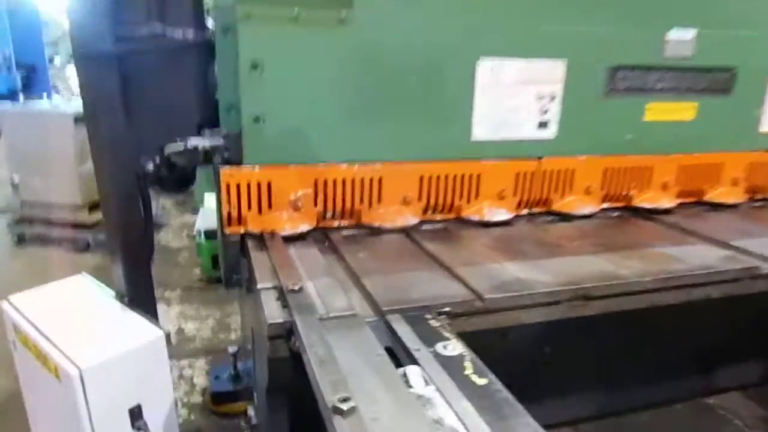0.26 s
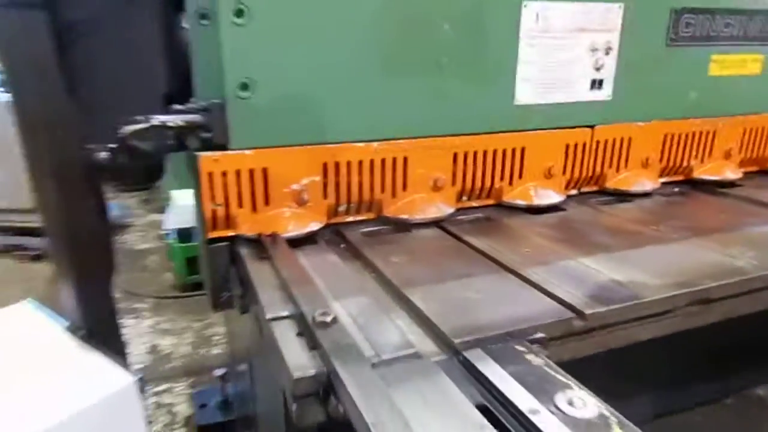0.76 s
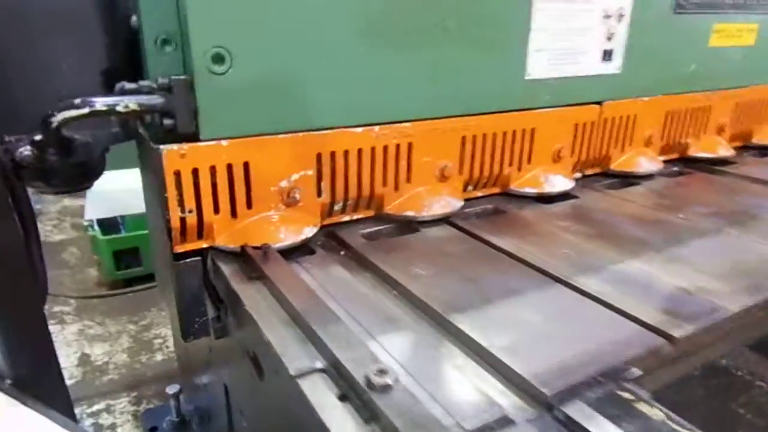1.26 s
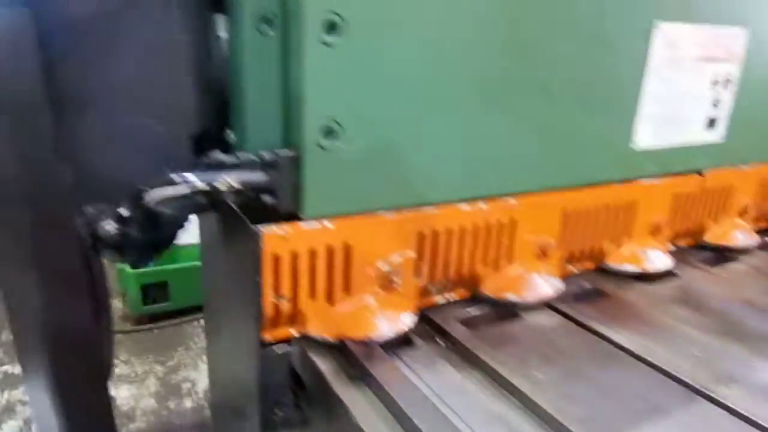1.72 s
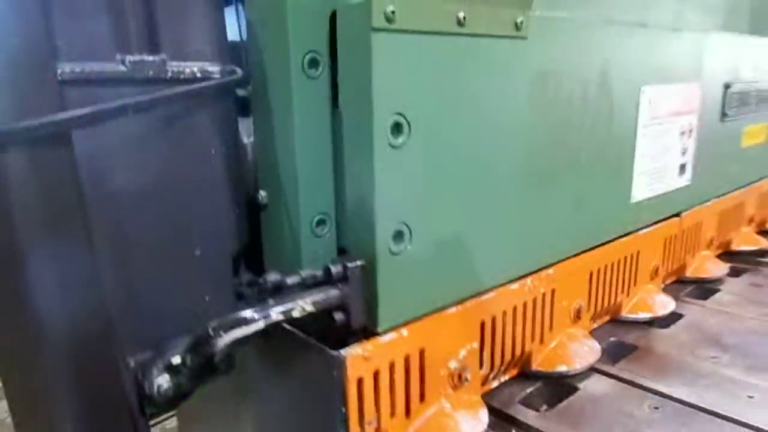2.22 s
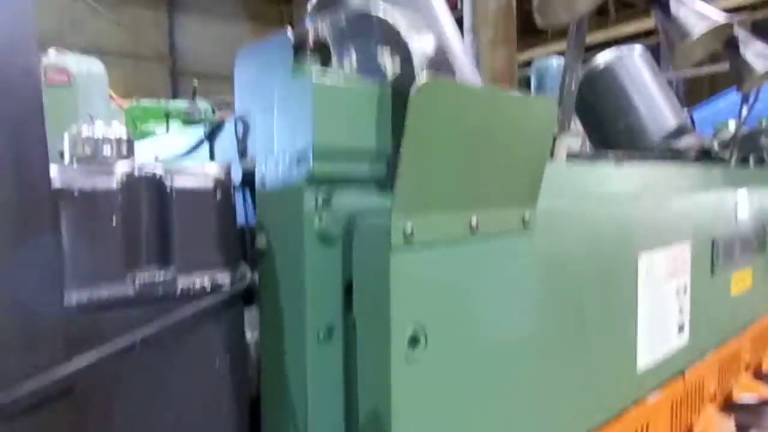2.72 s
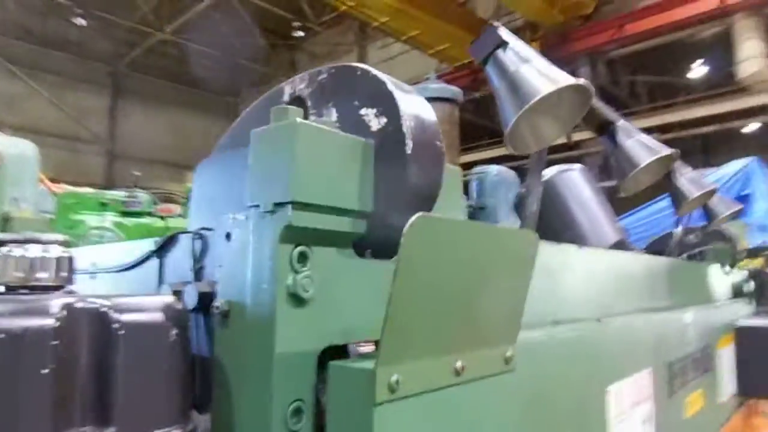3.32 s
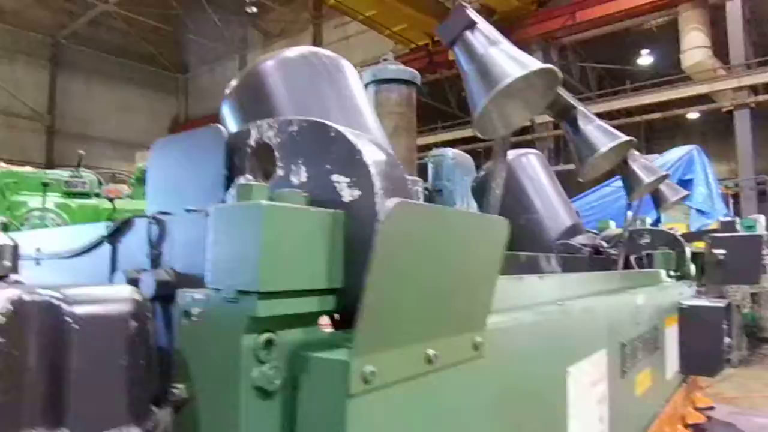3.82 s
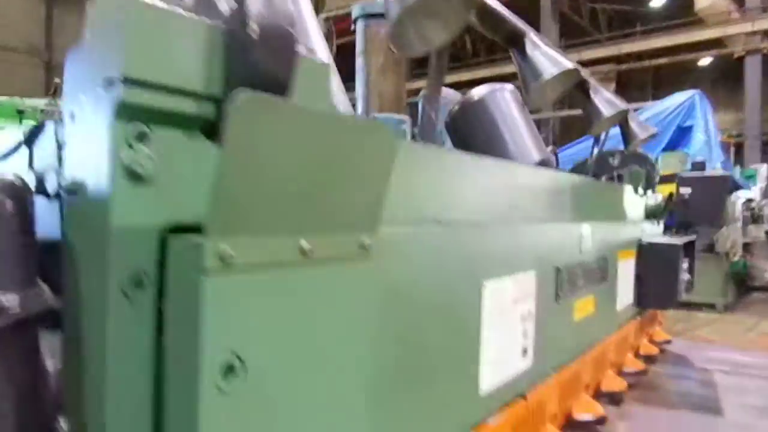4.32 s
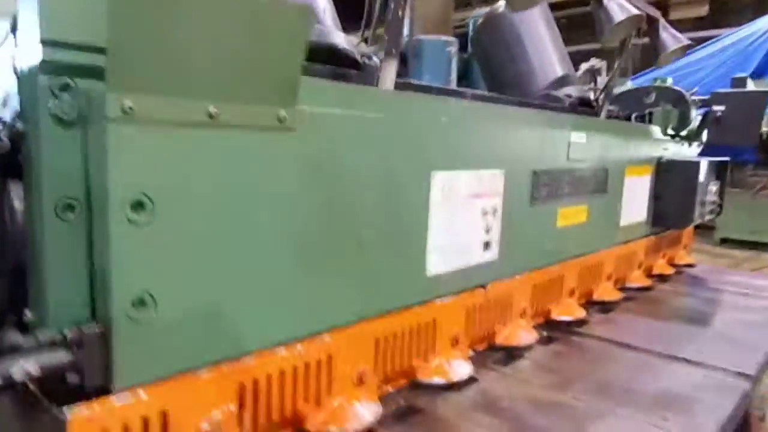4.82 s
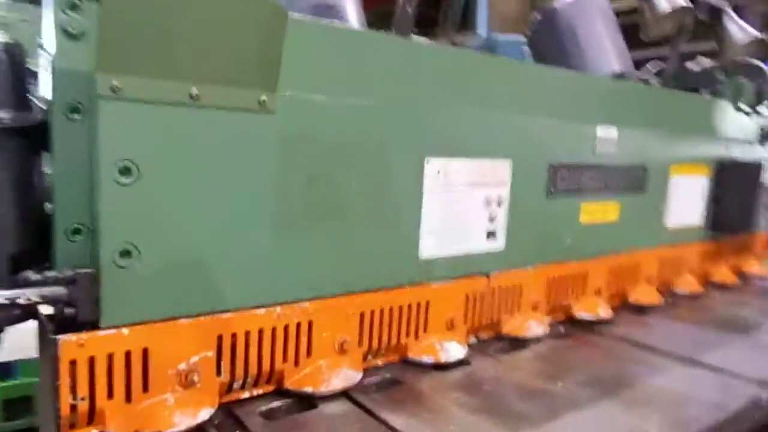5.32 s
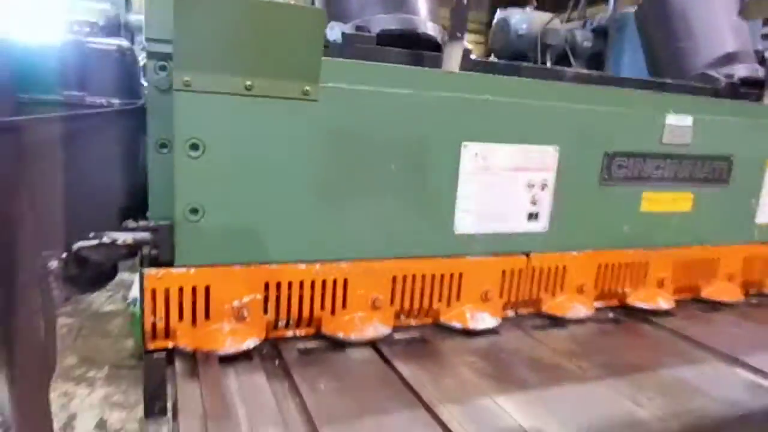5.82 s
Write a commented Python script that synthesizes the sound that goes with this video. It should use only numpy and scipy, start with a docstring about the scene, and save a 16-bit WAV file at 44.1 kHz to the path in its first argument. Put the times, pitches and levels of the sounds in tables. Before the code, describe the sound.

Steady, heavy machine rhythm at about one cycle per second. Dense, sharp steel rattling opens the sound, then a short rush like escaping air, more rattling and a weighty thump of the cast frame, a small gap, a knock from a linkage and the rattle again. Six strokes are heard, close and dry with a weak tail from a big industrial hall and very quiet low motor hum. Treble is crisp but capped.

```python
"""A mechanical plate shear idles in a large workshop, one stroke a second, heard close over a motor hum.
The take opens on the clatter of the clamp row: tiny collisions, steel contacts and ringing steel parts.
Then come a short hiss of fine grit, a tick, and a second clatter that swells into a heavy thud, jolts
ringing in the modes of the frame. A dull knock with a ringing link, made of decaying sines, leads into
the next turn. The hall rings on faintly as decaying noise; the microphone port notches the treble."""
import sys
import numpy as np
from scipy import signal
from scipy.fft import rfft, irfft
from scipy.io import wavfile
from scipy.ndimage import uniform_filter1d

SR = 44100
rng = np.random.default_rng(int(sys.argv[2]) if len(sys.argv) > 2 else 0)


def wav_record(signal):
    """Record a signal, one row per channel, as 16-bit PCM in the file named by sys.argv[1]."""
    frames = np.transpose(np.atleast_2d(signal))
    bounded = np.clip(frames, -1, 1)
    # unit amplitude maps onto the largest positive 16-bit level
    quanta = np.round(bounded * 32767).astype(np.int16)
    wavfile.write(sys.argv[1], SR, quanta)


N = 267246
T = np.arange(N) / SR   # s

# The motor hum. Each row: frequency in Hz, relative level in dB.
HUM_SPECTRUM = [(15, -41), (25, -2.5), (161, 0.5), (293, -0.5), (354, -8), (624, -3), (1040, -7),
                (1560, -11.5), (3250, -7.5), (7920, -18), (11000, -29), (14400, -30), (16000, -43)]
HUM_DB = -50

# The hall. Each row: frequency in Hz, time to fall 60 dB in s, relative starting level in dB.
HALL_DECAY = [(60, 3.2, 1.5), (300, 4.5, -2), (1510, 1.75, -1), (4930, 0.65, -2.5), (14000, 0.2, 4.5)]
HALL_DB = -29.5   # energy of the echo response against the direct sound

# Bands of the bright noise. Each row: centre in Hz, part it belongs to (0 middle, 1 low, 2 top).
# The lowest band belongs to no part and is left out.
NOISE_BANDS = [(900, None), (1900, 1), (2900, 1), (4200, 0), (5400, 0), (6700, 0), (8200, 0), (10000, 2),
               (13500, 2), (20000, 2)]
# Colour of the bright noise. Each row: frequency in Hz, relative level in dB.
BRIGHT_SPECTRUM = [(410, -30), (700, 17), (1380, -17.5), (1870, -6.5), (3280, -3.5), (3940, 0), (6230, 3),
                   (7890, -2.5), (10800, -7), (15000, -14.5), (16000, -51)]

# Hisses. Each row: start in s, hiss level in dB, shift of its top part in dB,
# level of the frame's shaking in dB, shift of its upper part in dB.
HISSES = [(0.247, -36.5, -1, -40, 1), (1.25, -36, 1, -39.5, 0.5), (2.256, -37.5, 0, -39.5, 0.5),
          (3.262, -35, -1, -41.5, 3.5), (4.266, -33.5, -0.5, -37, -1.5), (5.272, -33.5, 0.5, -37.5, -0.5)]
# Course of a hiss. Each row: time from its start in s, level in dB, low and top part against it in dB.
HISS_COURSE = [(0.0, -9, -10, -2), (0.012, 0, -2, -4), (0.084, -13.5, -3.5, -6.5), (0.093, -6, -5, 4)]
# The frame under a hiss. Each row: time from its start in s, level in dB, upper part against it in dB.
HISS_SHAKE = [(0.0, -16, -6), (0.016, -0.5, -1.5), (0.1, -8, 0)]

# Knocks on the link. Each row: start in s, level in dB, bright part of the crack in dB, crack length in s,
# ring of the low modes and of the high modes against the level in dB, relative level of the thump in dB.
KNOCKS = [(0.84, -29, -17, 0.019, -13, -28, -35), (0.865, -21.5, -3, 0.016, -17, -19, -35),
          (1.842, -29, -24, 0.0078, -20, -7.5, -27.5), (1.8696, -24, 1.5, 0.015, -18, -9.5, -27),
          (2.845, -25.5, -25, 0.0058, -9.5, -12.5, -28.5), (2.882, -20.5, -6.5, 0.017, -7, -15.5, -29),
          (3.8534, -20.5, -22, 0.014, -25.5, -2.5, -23), (3.879, -17.5, 0, 0.011, -9, -14, -25),
          (4.859, -22.5, -19, 0.0049, -23, -25, -20), (4.886, -45, 11, 0.012, -10, -14, -30),
          (4.901, -25.5, -12, 0.026, -28, -19, -29), (5.8641, -30, -32, 0.0077, -14, -17, -22.5),
          (5.882, -52, -10, 0.012, -13, -25, -39), (5.908, -24.5, -11, 0.048, -8, -20, -35)]
# Modes of the link. Each row: frequency in Hz, relative level in dB, time to fall 60 dB undamped in s.
LINK_MODES = [(1367, 0, .22), (1653, -10, .15), (2067, -6, .15), (2433, -6, .2), (2918, 0, .17),
              (4258, -7, .13)]
# The frame shaking under the knocks. Each row: time in s, level in dB, shift of the upper part in dB.
KNOCK_SHAKES = [(0.844, -28, 3.5), (1.86, -32, 1), (2.882, -31, -3), (3.861, -26.5, 2), (4.888, -32, 0),
                (5.892, -31.5, -3)]
# Its course. Each row: time from the knock in s, level in dB, upper part against it in dB.
KNOCK_SHAKE = [(-0.01, -18, -17), (0.0, 0, 0), (0.04, -2, -13.5), (0.1, -16.5, -6)]

# Single steel contacts. Each row: start in s, level in dB, low part against it in dB,
# strongest pitch in Hz, length in s.
CONTACTS = [(0.0002, -10, -10, 5750, 0.016), (0.038, -21, -14, 4940, .012), (0.336, -32, -13, 3240, 0.0094),
            (0.3434, -30, -14, 7900, 0.0027), (0.378, -32, -11, 5250, .015), (0.398, -25, -17, 7260, .008),
            (0.405, -20, -11, 3280, .011), (0.413, -13, -20, 5270, 0.0087), (0.957, -35, -3, 5920, .008),
            (0.968, -27, -15, 3440, .007), (0.977, -14, -14, 7200, 0.0078), (1.001, -14, -12, 6200, .013),
            (1.014, -14.5, -16, 7500, 0.015), (1.032, -15.5, -20, 6070, 0.022),
            (1.341, -25, -3, 7250, 0.015), (1.364, -28.5, -13, 3650, .01), (1.378, -24, -3, 7350, .009),
            (1.39, -17, -16, 7270, .014), (1.415, -11.5, -4, 4130, .02), (1.9607, -33, -9, 4980, .01),
            (1.9825, -23.5, -8, 7640, 0.0061), (2.002, -31, -14, 3000, .006),
            (2.0107, -18, -16, 5800, .015), (2.029, -21, -12, 3200, .006), (2.041, -18, -3, 5700, 0.018),
            (2.347, -22.5, -6.5, 3330, 0.0049), (2.359, -35, -15, 3040, .009), (2.373, -26, 2, 3250, 0.018),
            (2.393, -16.5, -17, 3120, 0.023), (2.424, -13, -12, 6250, .008),
            (2.9652, -30, -22, 6850, 0.0054), (2.983, -29.5, -5, 3200, .005),
            (2.988, -12.5, -7, 6340, 0.0053), (3.0, -24, -17, 6150, .01), (3.0147, -11, -6, 6400, .017),
            (3.052, -18.5, -21, 4660, 0.013), (3.352, -25.5, 0.5, 3240, 0.0048),
            (3.36, -26.5, -15, 2900, .008), (3.3726, -28, 1, 6200, .012), (3.4003, -16.5, -2, 6900, .01),
            (3.4245, -15, 3.5, 3000, 0.019), (3.971, -32.5, -12, 3070, 0.012),
            (3.984, -27.5, 0, 2980, 0.01), (3.9938, -18.5, -6, 6290, 0.0095), (4.0166, -11, -5, 6400, .008),
            (4.0285, -14.5, -4, 6800, .008), (4.061, -22, -20, 4400, 0.0068),
            (4.358, -24.5, -7, 3000, 0.013), (4.392, -31, -13, 3370, .011), (4.4033, -19, -10, 3180, .015),
            (4.431, -15, 4, 5300, 0.01), (4.976, -31.5, -8, 5940, 0.014), (4.9977, -26, -12, 6500, 0.0085),
            (5.0174, -20, 1.5, 3170, 0.0066), (5.023, -10.5, -14, 6300, 0.0056),
            (5.035, -18, -16, 6640, 0.01), (5.056, -16.5, -4, 5030, .006), (5.066, -19.5, -6, 4970, 0.0072),
            (5.3643, -26.5, -3, 7020, .008), (5.3735, -27, -19, 8100, .008), (5.397, -23, -14, 6700, 0.012),
            (5.408, -14, 0, 7300, .012), (5.438, -10.5, -16, 7500, .01), (5.983, -33, -15, 5000, .011),
            (5.995, -25.5, -12, 6600, 0.012), (6.004, -14, -9.5, 7500, 0.0039),
            (6.019, -23, -8, 6500, .007), (6.027, -11, -9, 5900, .006), (6.038, -13, -14, 7000, 0.011)]
CONTACT_TOP_DB = -10   # top part against the contact's level
# Ringing steel parts. Each row: frequency in Hz, nominal width in Hz, relative level in dB.
STEEL_PARTS = [(2198, 38, 2), (2605, 12, -8.5), (3246, 85, 7.5), (3710, 38, -14), (4233, 17, -1),
               (4780, 17, 4.5), (5150, 110, 6.5), (5790, 17, -16), (6350, 25, -18), (6450, 82, -14),
               (6000, 40, -18), (7000, 84, 5), (7220, 85, -7), (7880, 190, 9.5), (8300, 78, -7.5),
               (9050, 38, -16)]

# Clatters of the clamp row. Each row: last peak in s, chatter level in dB, shift of its top part in dB,
# level of the frame's shaking in dB, shift of its upper part in dB.
CLAMPS = [(0.042, -19, 2, -34, -2), (1.047, -15.5, 2, -33, 2), (2.056, -18, 3, -32, -2.5),
          (3.057, -15.5, -2, -32, 0), (4.064, -15, -2.5, -32, 1), (5.066, -18.5, 1.5, -33, 1),
          (6.066, -20, 3, -32.5, 3)]
# Course of the chatter. Each row: time from the peak in s, level in dB, low and top part against it in dB.
CLAMP_CHATTER = [(-0.08, -22, 0, -9), (-0.048, -12.5, 0, -9), (-0.035, -4.5, -3, -10),
                 (0.0, -1.5, -10, -10), (0.028, -25.5, -2.5, -15), (0.065, -44, -13, -9)]
# The frame under it. Each row: time from the peak in s, level in dB, upper part against it in dB.
CLAMP_SHAKE = [(-0.085, -16, -3), (-0.03, -4, 5), (0.0, -0.5, 4.5), (0.05, -15.5, -6.5), (0.08, -19, -5)]

# Heavy strokes. Each row: chatter peak in s, its level in dB, shift of its top part in dB,
# thud in s, its level in dB, shift of its upper part in dB, relative level of its first thump in dB.
STROKES = [(0.427, -17, 0.5, 0.45, -16, -1, -17), (1.43, -15.5, 0.5, 1.452, -13.5, 0.5, -13.5),
           (2.431, -15, -1, 2.469, -17.5, 3.5, -24), (3.438, -15, -1, 3.465, -16, 3.5, -22),
           (4.441, -13.5, -0.5, 4.472, -14.5, 1.5, -17), (5.446, -13, 1, 5.475, -12.5, 0, -8.5)]
# Course of the chatter. Each row: time from the peak in s, level in dB, low and top part against it in dB.
STROKE_CHATTER = [(-0.065, -22.5, 0, -20), (-0.045, -11.5, -1.2, -2), (0.0, 0, -0.72, -4.5),
                  (0.085, -24, 1, -12.5), (0.135, -31, 1, -11.5)]
# Course of the thud. Each row: time from the thud in s, level in dB, upper part against it in dB.
THUD_SHAKE = [(-0.085, -28.5, 2), (-0.045, -16, 5.5), (-0.02, -8, 2), (0.0, -0.5, -11), (0.09, -26, -9.5),
              (0.17, -33.5, -5.5)]
THUMP_LEADS_S = 0.01202   # the first thump comes this long before the thud

# Low modes of the casting. Each row: frequency in Hz, width in Hz, relative level in dB.
FRAME_MODES = [(106.8, 11, -3), (154.4, 17.7, 3), (206.5, 24.4, 1.5), (259.5, 40, -1.5), (347, 18.4, 4),
               (406, 67, -2.5), (519.4, 43, 2), (551, 61, -3.5)]
# Broad rumble between the modes. Each row: frequency in Hz, relative level in dB.
RUMBLE_SPECTRUM = [(15, -57), (25, 18.5), (166, 0.5), (415, -2.5), (492, -8), (571, 5), (965, 10),
                   (1380, -77), (2200, -27), (2860, -47), (4840, -120)]

# Notch of the microphone port and its width; then the stop-band edges of two plain treble cuts.
NOTCH_HZ, NOTCH_WIDTH_HZ = 10930, 1020
TOP_HZ, CUTOFF_HZ = 15950, 16850


def amp(db):
    """Decibels to an amplitude factor."""
    return 10 ** (np.asarray(db) / 20)


def rms_one(x):
    """Scale to an rms of 1."""
    return x / np.sqrt(np.mean(x ** 2) + 1e-20)


def at_hz(points, hz, column=1):
    """Read a table column at a frequency, interpolating over log frequency."""
    points = np.array(points)
    return np.interp(np.log(hz), np.log(points[:, 0]), points[:, column])


def band(x, low_hz, high_hz):
    """Band-pass with gentle slopes."""
    return signal.sosfilt(signal.butter(2, [low_hz, high_hz], "band", fs=SR, output="sos"), x)


def coloured(x, spectrum):
    """Steady noise given a spectrum; rms 1."""
    hz = np.maximum(np.arange(N // 2 + 1) * SR / N, 1)
    return rms_one(irfft(rfft(x) * amp(at_hz(spectrum, hz)), N))


def resonance(x, hz, width_hz):
    """One mode: a two-pole resonator that rings longer the narrower it is."""
    r = np.exp(-np.pi * width_hz / SR)
    feedback = [1, -2 * r * np.cos(2 * np.pi * hz / SR), r * r]
    return signal.lfilter([(1 - r * r) / 2, 0, (r * r - 1) / 2], feedback, x)


def grit(per_s, spread_db):
    """Random clicks of uneven size and sign; rms 1."""
    sizes = amp(spread_db * np.minimum(rng.exponential(1, N), 4)) * rng.choice([-1, 1], N)
    return rms_one(sizes * (rng.random(N) < per_s / SR))


def burst_envelope(t, lasts_s, fall_db_per_s, stop_db_per_s):
    """Burst envelope: fast attack, slow fall, then a steep fall after the given length."""
    attack = np.minimum(t / 0.0005, 1)
    return attack * amp(-fall_db_per_s * t - stop_db_per_s * np.maximum(t - lasts_s, 0))


def placed(course, events, at=0, level=1):
    """The shared course at each event's time and level; the column after level shifts its highest part."""
    course = np.array(course)
    unshifted = [0] * (course.shape[1] - 3)
    return [course + [e[at], e[level], *unshifted, e[level + 1]] for e in events]


def bursts(tables, release_s):
    """Gains of each part over time; the first is the level, the others lie relative to it."""
    gains = np.zeros((len(tables[0][0]) - 1, N))
    for rows in tables:
        s, level_db, *parts_db = np.transpose(rows)
        on = (T >= s[0]) & (T < s[-1] + 1)
        t = T[on]
        onset = np.minimum((t - s[0]) / 0.0023, 1)
        release = amp(-60 * np.maximum(t - s[-1], 0) / release_s)   # dies away after the last row
        for k, db in enumerate([0, *parts_db]):
            gains[k, on] += onset * release * amp(np.interp(t, s, level_db + db))
    return gains


def three_parts(per_s, spread_db, patchy_db, patches_per_s):
    """Middle, low and top part of bright gritty noise, rms 1 each; every band swells and sinks by itself."""
    log_hz = np.log(np.arange(N // 2 + 1) * SR / N + 1)
    log_centres = np.log([centre for centre, _ in NOISE_BANDS])
    noise = rfft(coloured(grit(per_s, spread_db), BRIGHT_SPECTRUM))
    parts = np.zeros((3, N))
    for k, (_, part) in enumerate(NOISE_BANDS):
        if part is None:
            continue
        # overlapping bands that add up to one
        share = np.interp(log_hz, log_centres, np.arange(len(NOISE_BANDS)) == k)
        swell = np.interp(T * patches_per_s, np.arange(2000), rng.standard_normal(2000))
        parts[part] += amp(patchy_db * swell) * irfft(noise * share, N)
    return np.array([rms_one(part) for part in parts])


def motor_hum():
    """The motor's steady hum: noise with a spectrum weighted to the lows."""
    return amp(HUM_DB) * coloured(rng.standard_normal(N), HUM_SPECTRUM)


def hall(x):
    """Diffuse echo: noise that dies band by band, also fed by the stroke before the start."""
    t, edges = T[:2 * SR], 40 * 2 ** np.arange(0, 9, .5)   # half-octave bands
    tail = 0
    for low, high in zip(edges, edges[1:]):
        decay_db = at_hz(HALL_DECAY, low, column=2) - 60 * t / at_hz(HALL_DECAY, low)
        tail = tail + band(rng.standard_normal(len(t)), low, high) * amp(decay_db)
    tail = tail * np.minimum(t / 0.0078, 1)
    tail = tail / np.sqrt(np.sum(tail ** 2))
    earlier = np.concatenate([x[:SR], x])   # the machine repeats each second
    return signal.fftconvolve(earlier, tail)[SR:SR + N]


def hiss():
    """A fine-grained rush, like a brake dragging or air escaping."""
    gains = bursts(placed(HISS_COURSE, HISSES), release_s=0.08)
    return np.sum(gains * three_parts(6000, 2.6, patchy_db=2.2, patches_per_s=80.0), axis=0)


def link(damped_s):
    """A short rough crack, then the ring of the link, which fades fast after a fixed time."""
    out, noise = np.zeros(N), rng.standard_normal(N)
    rough = rms_one(band(noise, 1200, 4900))
    bright = rms_one(signal.lfilter([1, .6], [1], band(noise, 3900, 12200)))
    roughening = rms_one(band(noise, 28, 134))   # slow noise that roughens the level of the ring
    start_phases = rng.random((len(KNOCKS), len(LINK_MODES)))   # cycles
    t = T[:SR // 8]
    envelope = np.minimum(t / 0.0009, 1) * amp(-900 * np.maximum(t - damped_s, 0))
    for (s, db, top_db, lasts_s, low_db, high_db, _), phases in zip(KNOCKS, start_phases):
        i = round(s * SR)
        span = slice(i, i + len(t))
        ring = 0
        for (hz, mode_db, t60), phase in zip(LINK_MODES, phases):
            group_db = low_db if hz < 1900 else high_db
            ring = ring + amp(mode_db + group_db - 60 * t / t60) * np.sin(2 * np.pi * (hz * t + phase))
        ring = ring * (1 + 0.39 * roughening[span]) * envelope
        crack = amp(-15.5) * burst_envelope(t, lasts_s, fall_db_per_s=250.5, stop_db_per_s=1198.5)
        crack = crack * (rough[span] + amp(top_db) * bright[span])
        out[span] += amp(db) * (ring + crack)
    return out


def contacts(pitch_db):
    """Gains of middle, low and top part for all steel contacts, and the pitched core of each."""
    power, core, noise = np.zeros((3, N)), np.zeros(N), grit(6000, 2.4)
    for s, db, low_db, hz, lasts_s in CONTACTS:
        i = round(s * SR)
        t = T[:min(SR // 5, N - i)]
        span = slice(i, i + len(t))
        shape = amp(db) * burst_envelope(t, lasts_s, fall_db_per_s=519, stop_db_per_s=2500)
        power[:, span] += (amp([[0], [low_db], [CONTACT_TOP_DB]]) * shape) ** 2
        core[span] += amp(pitch_db) * shape * rms_one(resonance(noise[span], hz, 720))
    return np.sqrt(power), core


def clatter(ring_db):
    """Dense tiny collisions sound directly, and the contacts set the steel parts ringing."""
    contact_gains, core = contacts(pitch_db=2.0)
    courses = placed(CLAMP_CHATTER, CLAMPS) + placed(STROKE_CHATTER, STROKES)
    force = np.hypot(contact_gains, bursts(courses, release_s=0.83))
    direct = np.sum(force * three_parts(7000, 1.86, patchy_db=3.0, patches_per_s=120.0), axis=0)
    rung = 0
    for hz, width_hz, db in STEEL_PARTS:   # every part is shaken by collisions of its own
        drive = contact_gains[0] * grit(250, 4.0) + 1e-18
        level = amp(db) * np.sqrt(SR / width_hz)
        rung = rung + level * resonance(drive, hz, max(width_hz, 40))   # no part rings narrower than 40 Hz
    return direct + core + amp(ring_db) * rung


def frame(broad_db, thump_db):
    """Irregular jolts ring in the low modes of the casting, with a broad rumble; knocks and thuds add
    short thumps."""
    shakes = placed(CLAMP_SHAKE, CLAMPS, level=3) + placed(HISS_SHAKE, HISSES, level=3)
    shakes += placed(THUD_SHAKE, STROKES, at=3, level=4) + placed(KNOCK_SHAKE, KNOCK_SHAKES)
    low_gain, upper_gain = bursts(shakes, release_s=0.48)

    jolts, modes = grit(700, 2.9), 0
    for k, (hz, width_hz, db) in enumerate(FRAME_MODES):
        modes = modes + amp(db) * resonance(jolts, hz, width_hz) * (-1) ** k   # neighbours in opposite sign
    body = rms_one(modes) + amp(broad_db) * coloured(grit(2000, 1.9), RUMBLE_SPECTRUM)
    body = rms_one(band(band(body, 81, 2500), 80, 489))
    # even out the level swings of the noise
    body = body / (uniform_filter1d(body ** 2, size=3000) + .05) ** 0.6
    upper = rms_one(band(grit(4000, 4.0), 360, 1640))

    impulses = np.full(N, 1e-18)
    for row in KNOCKS:
        impulses[round(row[0] * SR)] = amp(row[-1] + thump_db)
    for row in STROKES:
        impulses[round((row[3] - THUMP_LEADS_S) * SR)] = amp(row[-1] + thump_db)
    thump = resonance(resonance(impulses, 367, 112), 440, 250)   # a few cycles long
    return low_gain * rms_one(body) + upper_gain * upper + thump


def scene():
    """The shear, its echo in the hall and the motor hum, on one channel."""
    shear = hiss() + link(damped_s=0.041) + clatter(ring_db=-21.0) + frame(broad_db=3, thump_db=44)
    return (motor_hum() + amp(HALL_DB) * hall(shear) + shear)[None]


def record(dry):
    """The microphone port has a notch in the treble; then peaks are rounded and the top is cut twice."""
    x = signal.lfilter(*signal.iirnotch(NOTCH_HZ, NOTCH_HZ / NOTCH_WIDTH_HZ, SR), dry)
    x = .7 * np.tanh(x / .7)
    x = signal.sosfilt(signal.cheby2(20, 45, TOP_HZ, fs=SR, output="sos"), x)
    return signal.sosfilt(signal.cheby2(12, 70, CUTOFF_HZ, fs=SR, output="sos"), x)


dry = scene()
out = record(dry)
wav_record(out)
```